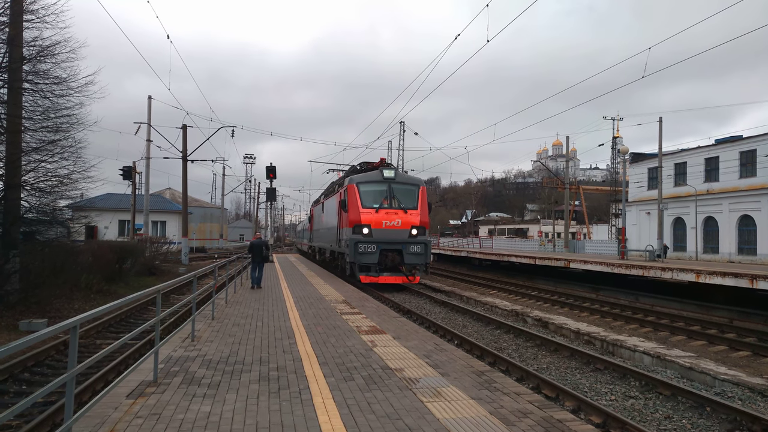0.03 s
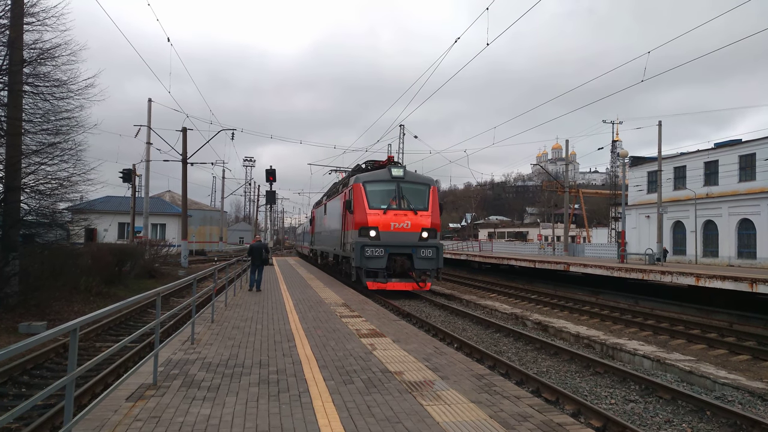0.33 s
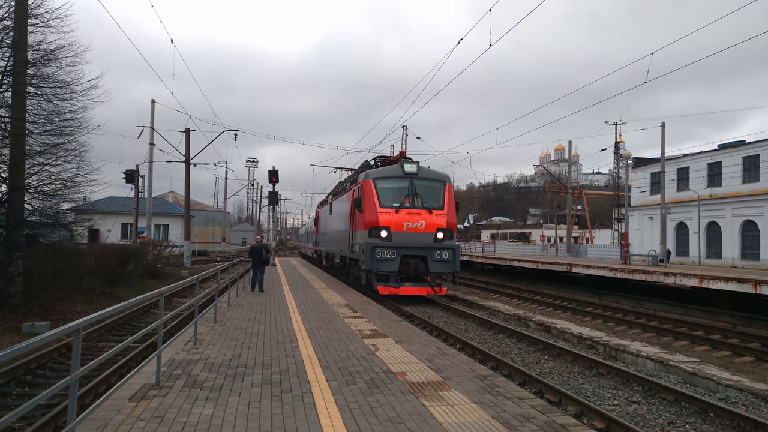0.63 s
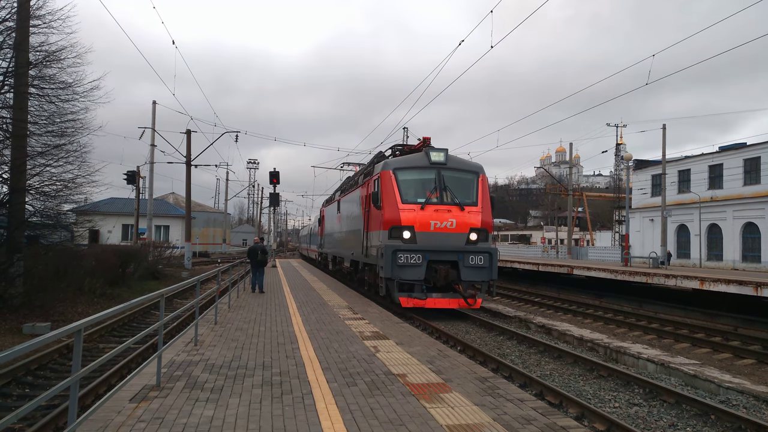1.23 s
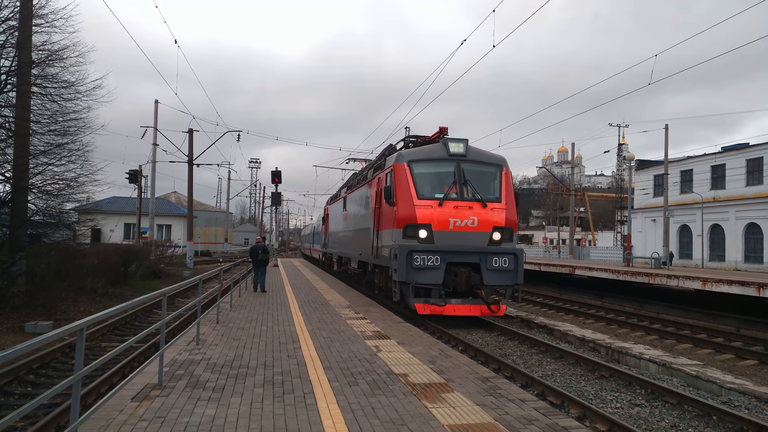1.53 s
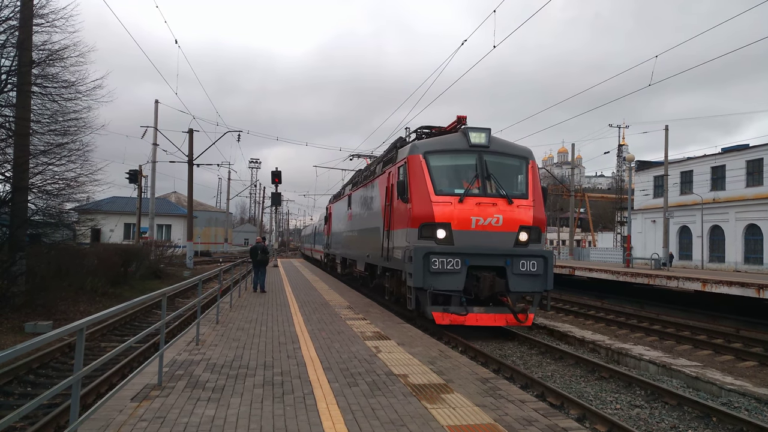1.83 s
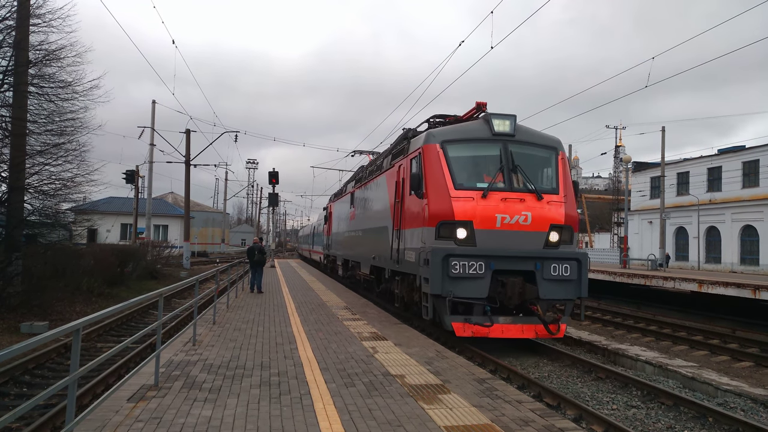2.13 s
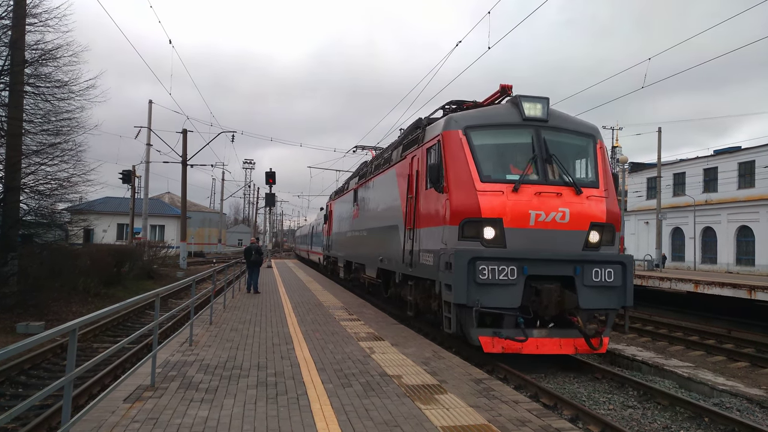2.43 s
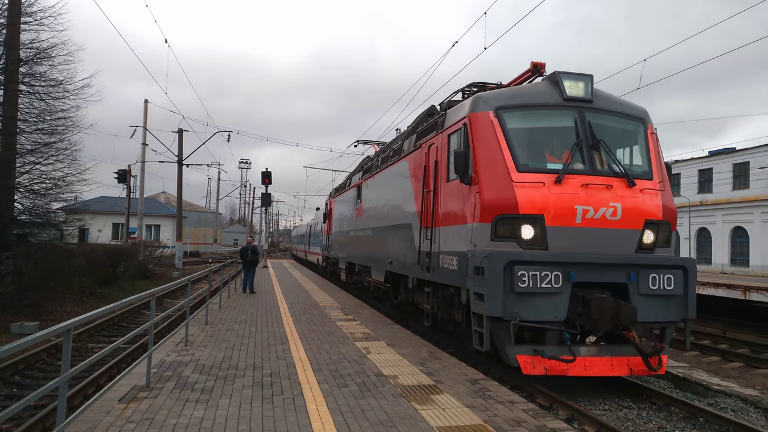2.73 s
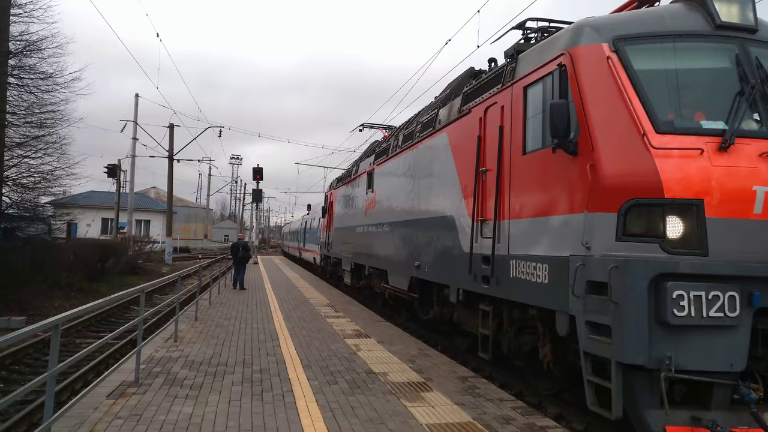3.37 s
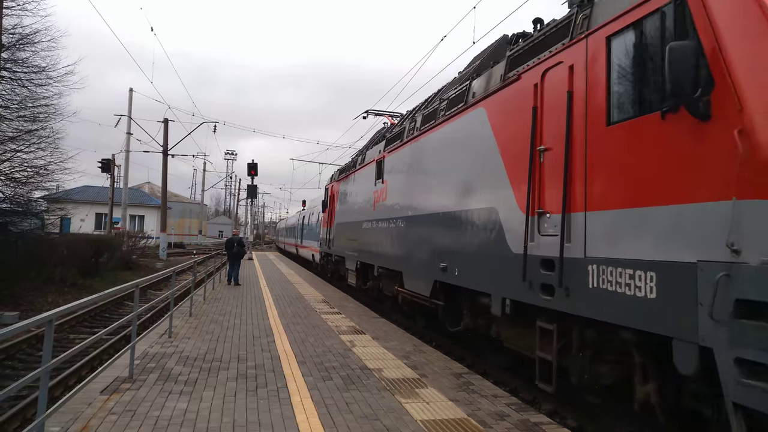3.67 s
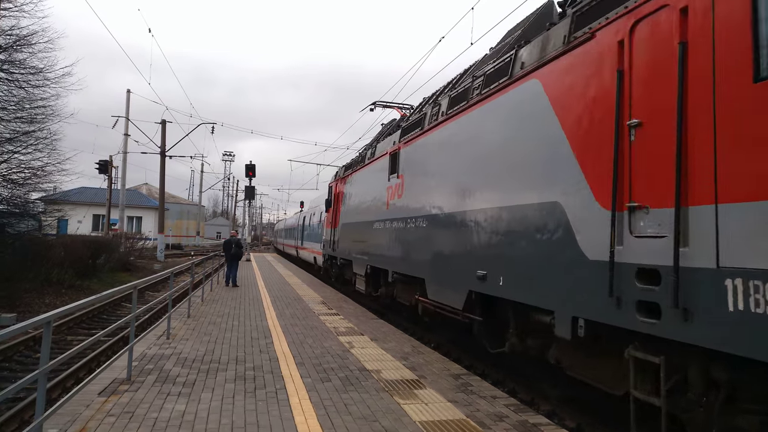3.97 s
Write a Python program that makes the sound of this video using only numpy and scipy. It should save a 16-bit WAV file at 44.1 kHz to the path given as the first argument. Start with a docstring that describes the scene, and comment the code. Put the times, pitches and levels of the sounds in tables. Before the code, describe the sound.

A train approaches a listener on a platform, its low rumble and wavering hum broken by uneven wheel knocks and faint squeaks. Soft wind puffs touch the microphone, and a loud, ringing clack comes as the locomotive draws level.

```python
"""On a station platform, an electric locomotive rolls in and draws level with the listener.
Its machinery makes a deep hum that swells and fades, and a thin whine. Rough wheels on rough rails
rumble and hiss, knock over the joints between rails and chirp faintly where their rims rub.
Light wind brushes the microphone; at the end a wheel hits a joint close by with a loud steel clack."""
import sys
import numpy as np
from scipy import signal
from scipy.fft import rfft, irfft
from scipy.io import wavfile

SR = 44100
rng = np.random.default_rng(int(sys.argv[2]) if len(sys.argv) > 2 else 0)


def digitize_waveform(pressure):
    """Quantize a signal to 16-bit integers and store it at the path in sys.argv[1].

    Rows of a 2-D input are taken as channels; values are limited to [-1, 1].
    """
    field = np.atleast_2d(pressure).T
    bounded = np.clip(field, -1, 1)
    quanta = np.round(bounded * 32767).astype(np.int16)
    wavfile.write(sys.argv[1], SR, quanta)


N = 176400

# how alike left and right are, up the track and close by: f/Hz, likeness (1 same, -1 opposite)
LIKENESS_AHEAD = [(100,.96),(330,1),(700,0.59),(1300,-0.48),(2200,0.55),(3500,0.39),(7000,0.17),(16000,-0.068)]
LIKENESS_NEAR = [(100,1),(330,0.98),(700,0.64),(1300,-0.58),(2500,-0.32),(5400,-0.41),(6300,.3),(9000,-0.054)]
# tone colours (strength at each pitch) of a wheel's dull thud and sharp crack: f/Hz, level/dB
THUD_COLOUR = [(45,-24),(90,1.5),(130,9.5),(230,0),(320,-0.5),(420,-16.5),(900,-40),(3000,-82)]
CRACK_COLOUR = [(400,1),(4800,-1),(6500,10),(7600,-10.5),(15000,-29)]


def amp(db):
    """Turns decibels into a number to multiply a sound by."""
    return 10 ** (np.asarray(db) / 20)


def evened(x):
    """Scales a signal to an average power of 1."""
    return x / np.sqrt(np.mean(x ** 2) + 1e-20)


def read(points, hz):
    """Looks up a table's value at a pitch, with octaves evenly spaced."""
    f, value = np.transpose(points)
    return np.interp(np.log(hz + 1), np.log(f + 1), value)


def level(points):
    """Joins points (t/s, level/dB) into a volume curve."""
    return amp(np.interp(np.arange(N) / SR, *np.transpose(points)))


def since(s):
    """Seconds since a moment, zero before it."""
    return np.maximum(np.arange(N) / SR - s, 0)


def drift(hz):
    """A random wobble, up to about hz times a second."""
    f = np.fft.rfftfreq(N, 1 / SR)
    return evened(irfft(rfft(rng.standard_normal(N)) * np.exp(-(f / hz) ** 2) * (f > 0), N))


def struck(s, rise_s, t60, tail_db, tail_t60):
    """Volume of a blow: a rise, a quick fade and a weak long tail (t60: seconds to fall 60 dB)."""
    t = since(s)
    fall = -np.log(1000) * np.maximum(t - rise_s, 0)
    return np.minimum(t / rise_s, 1) * np.hypot(np.exp(fall / t60), amp(tail_db) * np.exp(fall / tail_t60))


def arch(s, length):
    """A smooth swell and fade."""
    return np.sin(np.pi * np.minimum(since(s) / length, 1))


def noise(colour, grain_db=0, likeness=None, alike=1, lean_db=0):
    """Stereo noise of a given colour, made of tiny impacts whose sizes vary by grain_db."""
    # how alike the two sides usually are: f/Hz, likeness
    usual_likeness = [(20,-.1),(70,.88),(280,1),(500,.1),(750,0.17),(1100,-0.72),(2500,0.039)]
    # how much louder the left side is: f/Hz, level/dB
    balance = [(180,0),(550,-2.5),(4970,-0.5)]
    f = np.fft.rfftfreq(N, 1 / SR)
    a, b = rfft(rng.standard_normal((2, N)) * amp(grain_db * drift(910)))
    same = np.clip(alike * read(likeness or usual_likeness, f), -1, 1)
    mid, side = a * np.sqrt(1 + same), b * np.sqrt(1 - same)
    lean = amp((read(balance, f) + lean_db) / 2)
    left_right = np.array([(mid + side) * lean, (mid - side) / lean])
    return evened(irfft(left_right * amp(read(colour, f)), N))


def out_of_step(likeness, coin):
    """Shifts a wave's left and right sides apart; coin (0 to 1) picks which one leads."""
    return np.sign(coin - .5) * np.arccos(np.clip(likeness, -1, 1)) * np.array([[-.5], [.5]])


def tone(hz, likeness):
    """A pure tone, steady or gliding, that reaches left and right out of step."""
    start, coin = rng.random(2)
    turns = np.cumsum(hz * np.ones(N)) / SR + start
    return np.sqrt(2) * np.sin(2 * np.pi * turns + out_of_step(likeness, coin))


def whistle(hz, width_hz, likeness=0.4):
    """A fuzzy tone: a narrow band of noise around a steady or gliding pitch."""
    f = np.fft.fftfreq(N, 1 / SR)
    white = rng.standard_normal((2, N)) + 1j * rng.standard_normal((2, N))
    flutter = np.fft.ifft(np.fft.fft(white) / (1 + (f / width_hz) ** 2))
    a, b = (flutter * np.exp(2j * np.pi * np.cumsum(hz * np.ones(N)) / SR)).real
    mid, side = a * np.sqrt(1 + likeness), b * np.sqrt(1 - likeness)
    return evened(np.array([mid + side, mid - side]))


def wind():
    """Low puffs of air hit each side of the microphone differently."""
    # puffs: t/s, length/s, level/dB
    puffs = [(0.695,0.14,-37),(3.60,0.1,-39),(3.874,0.095,-31)]
    # their colour: f/Hz, level/dB
    colour = [(20,-24),(70,3.5),(260,-9),(2000,-75)]
    return sum(amp(db) * arch(s, length) for s, length, db in puffs) * noise(colour, alike=0)


def whine(width_hz=32, growth_db_per_s=1.5, full_s=1.8):
    """Thin whistles from the locomotive grow a little as it nears."""
    # whistles at full strength: f/Hz, level/dB
    pitches = [(1560,-71.5),(2075,-66.5),(2840,-70)]
    nearing = amp(growth_db_per_s * np.minimum(np.arange(N) / SR - full_s, 0))
    return nearing * sum(amp(db) * whistle(hz, width_hz) for hz, db in pitches)


def distant_rush(first_lag_s=0.00161, lag_s_per_s=0.00066, echo_share=0.61):
    """The rush of far wheels mixes with its echo off the ground into slowly falling hollow tones."""
    # the rush's volume: t/s, level/dB
    volume = [(0,-49.5),(1.5,-60),(4,-75)]
    # its colour: f/Hz, level/dB
    colour = [(350,-14),(600,-3.5),(1000,2.5),(2400,0.5),(3300,-8.5),(8000,-42)]
    # pitches the echo boosts: width/Hz, starting level against the rush/dB, fade/(dB per s)
    peaks = [(16,-3.5,4),(22,-8,-4.5),(35,-10,3.5)]
    t = np.arange(N) / SR
    direct = noise(colour)
    lag = first_lag_s + lag_s_per_s * t  # the echo lags more as the train nears
    echo = np.array([np.interp(t - lag, t, side) for side in direct])
    tones = sum(amp(db - fade * t) * whistle((k + 1) / lag, width_hz, likeness=0.21)
                for k, (width_hz, db, fade) in enumerate(peaks))
    return level(volume) * (evened(direct + echo_share * echo) + tones)


def rim_chirps(stray_hz=30, sag_hz_per_s=320, rasp_db=4.0):
    """Wheel rims brush the rail: brief, unsteady squeaks that sag in pitch."""
    # squeaks: t/s, length/s, f/Hz, level/dB
    chirps = [(1.876,.095,3880,-55),(2.84,.11,3450,-63),(2.987,0.094,3989,-59.5)]
    stray = stray_hz * drift(140)
    squeaks = 0
    for s, length, hz, db in chirps:
        pitch = hz + stray - sag_hz_per_s * (since(s) - length / 2)
        squeaks += amp(db) * arch(s, length) * tone(pitch, 0.33)
    return squeaks * amp(rasp_db * drift(110))


def rolling():
    """Rough wheels on rough rails make a low rumble, a roar and a high hiss that shake together."""
    # volume of each: t/s, level/dB
    rumble_volume = [(0,-34),(.12,-43),(1,-42),(1.5,-39),(1.76,-42.5),(2.03,-36),(2.3,-42.5),(2.65,-39),(3.4,-38.5),(3.55,-33.5),(3.68,-38),(4,-30)]
    roar_volume = [(0,-49),(2,-47),(3.6,-46),(4,-40.5)]
    hiss_volume = [(0,-50.5),(.15,-55.5),(.8,-58),(1.76,-57.5),(2.1,-56),(2.7,-56),(4,-52)]
    # colour of each: f/Hz, level/dB
    rumble_colour = [(20,-42),(33,-23),(47,3),(65,6.5),(95,2),(130,1.5),(195,-4.5),(260,-4),(320,-13.5),(390,-18),(700,-48),(2000,-80)]
    roar_colour = [(150,2.5),(330,5.5),(420,-0.5),(500,1),(600,3.5),(830,2.5),(1000,0),(1300,-4.5),(1800,-7.5),(2100,-12),(2500,-18),(3500,-24),(8000,-46)]
    hiss_colour = [(800,-19),(2000,2.5),(3000,3),(4200,2.5),(5200,0),(6500,2),(7500,-6),(8500,-13),(9600,-24),(12000,-17.5),(16000,-21.5)]
    jolt = drift(14.3)
    rumble = amp(jolt) * noise(rumble_colour)
    roar = amp(0.83 * jolt) * noise(roar_colour, grain_db=1.5, likeness=LIKENESS_AHEAD, alike=0.78)
    hiss = amp(0.45 * jolt) * noise(hiss_colour, grain_db=1.0)
    return level(rumble_volume) * rumble + level(roar_volume) * roar + level(hiss_volume) * hiss


def tick():
    """A wheel catches a rail end with a tiny crack."""
    # steel touching steel: t/s, level/dB
    touches = [(1.44,-43)]
    volume = sum(amp(db) * struck(s, .0004, 0.0098, -24, .06) for s, db in touches)
    return volume * noise(CRACK_COLOUR, grain_db=1.0, likeness=LIKENESS_AHEAD)


def far_joints(rattle_db=0.4, stray_hz=8.5):
    """Wheels drop over joints up the track: each thuds, knocks, clashes and rings; the rail sizzles."""
    # wheel drops: t/s, rise/s, thud/dB, knock/dB, clash/dB, sizzle/dB, ring f/Hz, ring level/dB
    drops = [(0.0,0.007,-35.5,-46,-53,-63,619,-43),(0.546,0.0085,-40,-42,-49,-55,1010,-56),(1.294,.009,-41,-45,-55,-57.5,757,-53),(1.435,0.0097,-38,-39,-50,-53,761,-44.5),
             (1.826,0.014,-43,-40,-55,-70,856,-44.5),(1.845,0.01,-31,-35,-44.5,-48.5,615.4,-40.5),(2.408,0.0072,-30,-35.5,-43,-48,715,-42),(2.552,.008,-39.5,-44,-46,-60,2835,-54),
             (2.602,0.011,-40.5,-47,-54,-65,717,-44),(2.744,0.0091,-38,-44,-59,-61.5,303,-38),(3.151,0.014,-31.5,-37,-46,-53.5,742,-41),(3.295,.009,-39,-46,-46,-63,778,-47.5),(3.713,0.0046,-31,-35.5,-46,-47.5,740,-44)]
    # colours of a drop's parts: f/Hz, level/dB
    knock_colour = [(150,-12),(380,-3),(520,-3),(690,-1),(880,-1),(1150,-8),(1600,-28),(4000,-50)]
    clash_colour = [(700,-20),(1400,11),(2200,-1),(3200,4.5),(5000,-4),(6800,-2),(8200,-13),(9800,-30),(16000,-34)]
    sizzle_colour = [(1200,-9),(2500,-2),(3900,0.5),(5000,-0.5),(6600,3),(8000,-5.5),(9800,-21.5),(12000,-20.5),(16000,-37)]
    thud = knock = clash = sizzle = ring = 0
    stray = stray_hz * drift(29.2)
    for s, rise_s, thud_db, knock_db, clash_db, sizzle_db, ring_hz, ring_db in drops:
        # overlapping noises add up by power, so their volumes are squared
        thud += (amp(thud_db) * struck(s, 1.21 * rise_s, 0.13, -10.5, 0.76)) ** 2
        knock += (amp(knock_db) * struck(s, rise_s, 0.17, -11.0, 0.85)) ** 2
        clash += (amp(clash_db) * struck(s, 0.87 * rise_s, 0.13, -16, 0.48)) ** 2
        sizzle += (amp(sizzle_db) * struck(s, 0.039, 0.46, -27, .7)) ** 2
        ring += amp(ring_db) * struck(s, rise_s, 0.18, -16, 0.7) * tone(ring_hz + stray, 0.78)
    rattle = amp(rattle_db * drift(72))
    return (ring + np.sqrt(thud) * noise(THUD_COLOUR, likeness=LIKENESS_AHEAD)
            + rattle * np.sqrt(knock) * noise(knock_colour, grain_db=2.0, likeness=LIKENESS_AHEAD)
            + rattle * np.sqrt(clash) * noise(clash_colour, grain_db=2.5, likeness=LIKENESS_AHEAD)
            + np.sqrt(sizzle) * noise(sizzle_colour, grain_db=2.0, likeness=LIKENESS_AHEAD))


def hum(hz=76.4, waver_hz=0.25, flutter_db=0.44):
    """The locomotive's machinery makes one deep, nearly pure tone."""
    # its swells and fades: t/s, level/dB
    swells = [(0,-47),(.7,-39.5),(1.3,-33.5),(1.5,-43.5),(1.72,-56),(2.15,-42),(2.5,-31),(2.75,-33.5),(2.88,-45.5),(2.99,-33.5),(3.35,-34),(3.6,-41.5),(3.92,-34),(4,-40)]
    turns = np.cumsum(hz + waver_hz * drift(4.6)) / SR
    volume = level(swells) * amp(0.2 + flutter_db * drift(9.7))
    return volume * evened(np.sin(2 * np.pi * turns)) * amp([[-.3], [.3]])  # a bit louder on the right


def near_clack(crack_s=3.8305, thump_s=3.8325, thump_hz=242, thump_rise_s=0.0043):
    """A wheel hits the nearest joint: quick steel blows, a crack, a heavy thump and ringing metal."""
    # the wheel touches, lands and bounces: t/s, relative level/dB
    blows = [(3.816,-9.5),(3.8253,-6.5),(3.827,-1.5),(3.8435,-6),(3.872,-14)]
    # colours of those blows: f/Hz, level/dB
    knock_colour = [(120,-14),(320,2),(520,-8.5),(720,-1),(900,-4.5),(1200,-13),(1600,-26),(4000,-65)]
    clash_colour = [(700,-21),(1300,1),(2000,3),(2600,-0.5),(3500,-0.5),(4800,-1.5),(6300,1.5),(7400,-4),(8600,-11.5),(10000,-24),(13000,-25),(16000,-45)]
    # ringing notes of the wheel and its frame: f/Hz, relative level/dB, t60/s
    notes = [(122.5,-2,0.48),(167.1,-1.5,0.37),(298,-3.5,0.21),(695,-10,0.15),(800,-16,0.84),(876,-8,0.2),(1230,-14,0.28),(1570,-28,0.82),(3940,-30,1),(6200,-26,0.28)]
    knock_power = sum((amp(db) * struck(s, 0.0024, 0.096, -16.0, 0.54)) ** 2 for s, db in blows)
    clash_power = sum((amp(db) * struck(s, 0.00065, 0.04, -5.5, 0.32)) ** 2 for s, db in blows[1:])
    knock = np.sqrt(knock_power) * noise(knock_colour, grain_db=1.5, likeness=LIKENESS_NEAR, lean_db=-.5)
    clash = np.sqrt(clash_power) * noise(clash_colour, grain_db=1.5, likeness=LIKENESS_NEAR, lean_db=3)
    crack = struck(crack_s, 0.00035, 0.026, -28, .1) * noise(CRACK_COLOUR, grain_db=3, lean_db=3)
    t = since(thump_s)
    thump = t / thump_rise_s * np.exp(1 - t / thump_rise_s) * np.sin(2 * np.pi * thump_hz * t)
    shudder = struck(thump_s, .004, 0.47, -10, .8) * noise(THUD_COLOUR, likeness=LIKENESS_NEAR)
    ring = 0
    for hz, db, t60 in notes:
        start, coin = rng.random(2)
        wave = np.sin(2 * np.pi * (hz * t + start) + out_of_step(read(LIKENESS_NEAR, hz), coin))
        ring += amp(db) * np.exp(-np.log(1000) * t / t60) * wave
    ring *= np.minimum(t / 0.0016, 1)  # silent until the thump
    return (amp(-18.5) * knock + amp(-24.5) * clash + amp(-21.5) * crack
            + amp(-16) * thump + amp(-25) * shudder + amp(-20.5) * ring)


def scene():
    """The train and the wind, heard from the platform."""
    train = hum() + whine() + distant_rush() + rolling() + far_joints() + tick() + near_clack()
    return train + rim_chirps() + wind()


def record(dry):
    """Trims away the deepest bass (below 30 Hz) and the highest treble (above 15720 Hz)."""
    bass_cut = signal.butter(4, 30, "high", fs=SR, output="sos")
    treble_cut = signal.firwin(511, 15720, window=("kaiser", 9), fs=SR)
    return signal.oaconvolve(signal.sosfilt(bass_cut, dry), treble_cut[None], "same")


dry = scene()
out = record(dry)
digitize_waveform(out)
```